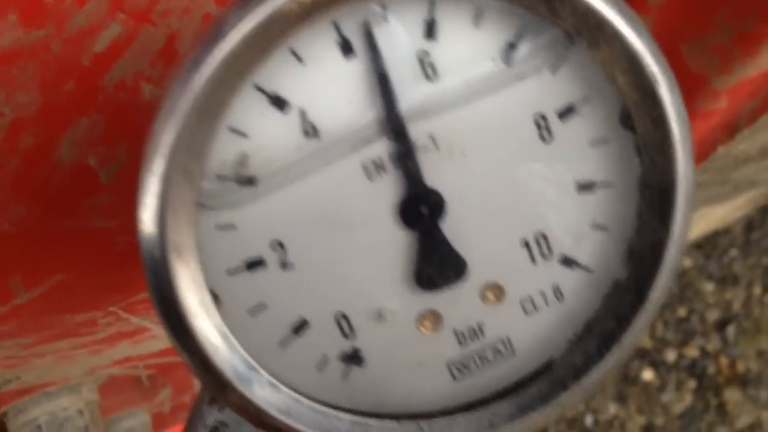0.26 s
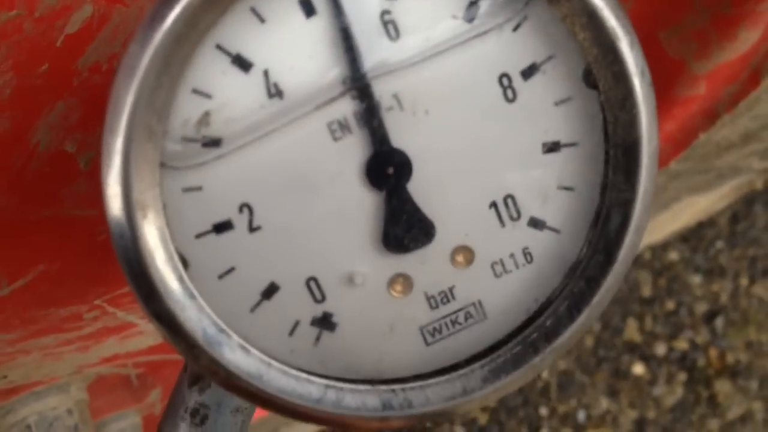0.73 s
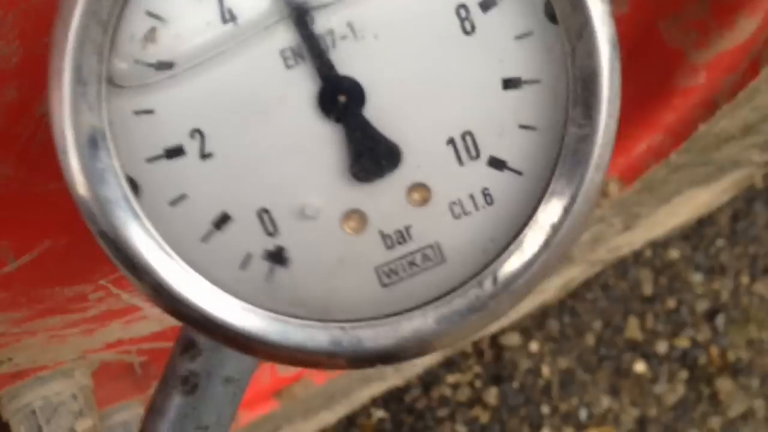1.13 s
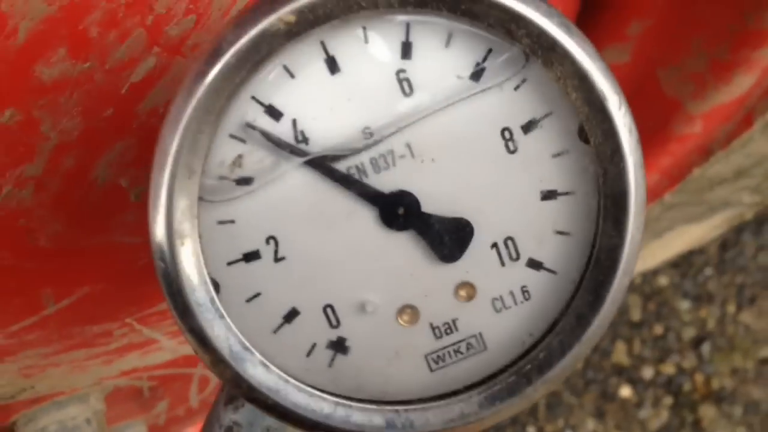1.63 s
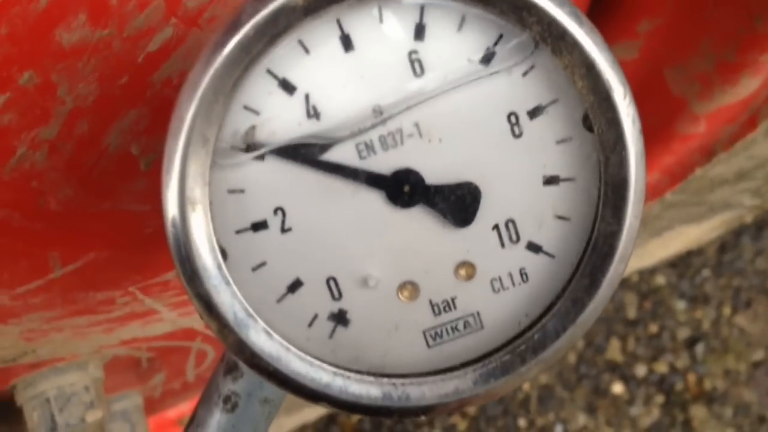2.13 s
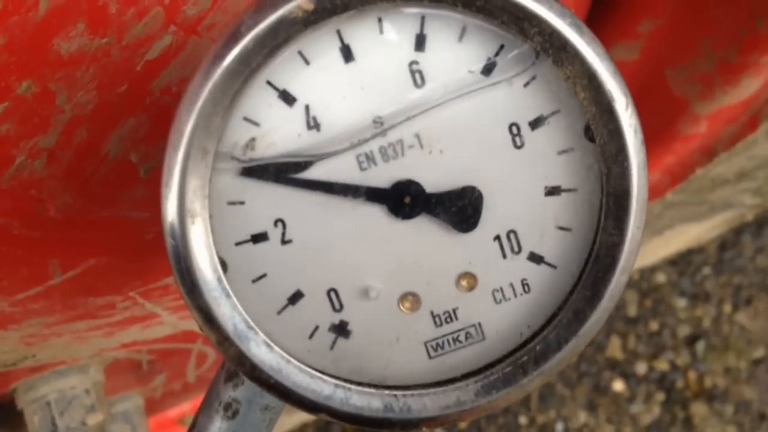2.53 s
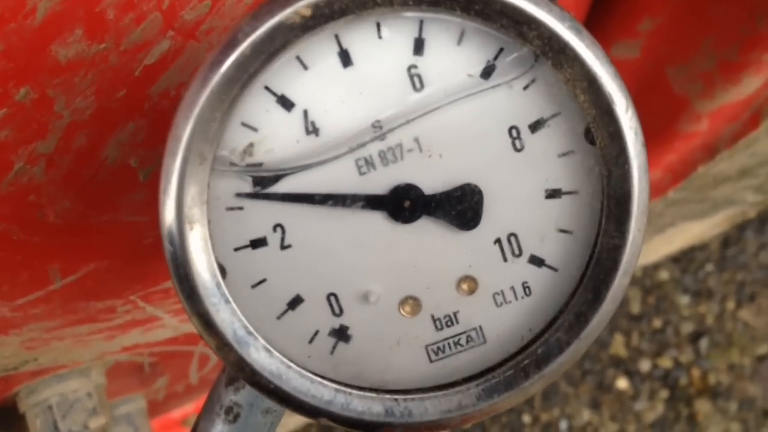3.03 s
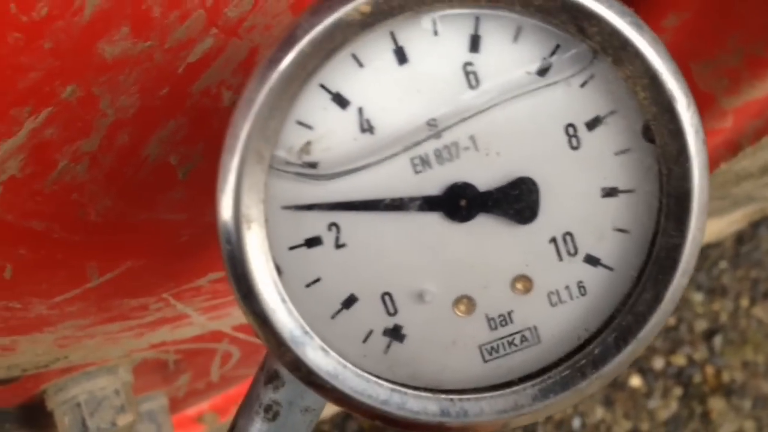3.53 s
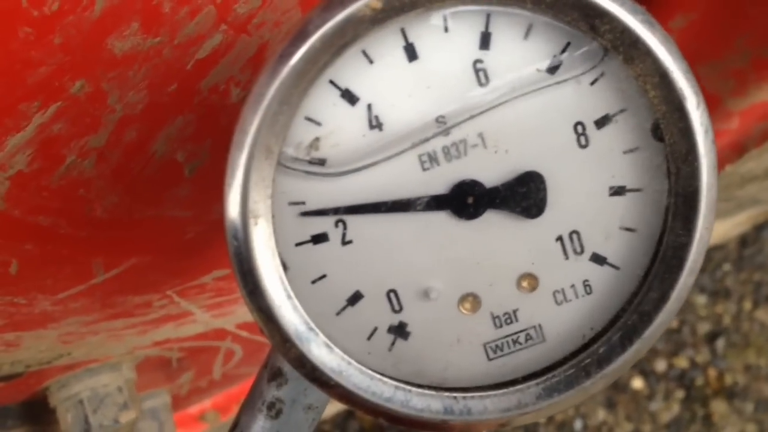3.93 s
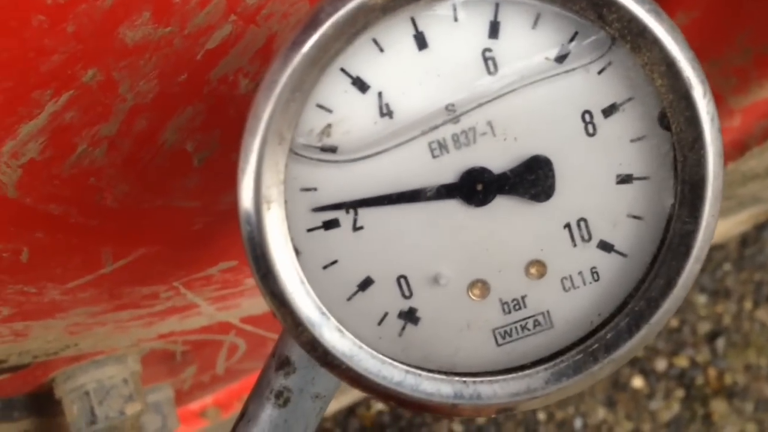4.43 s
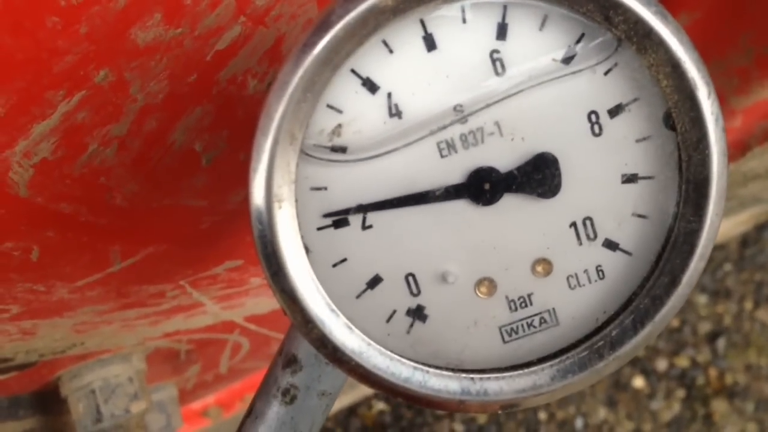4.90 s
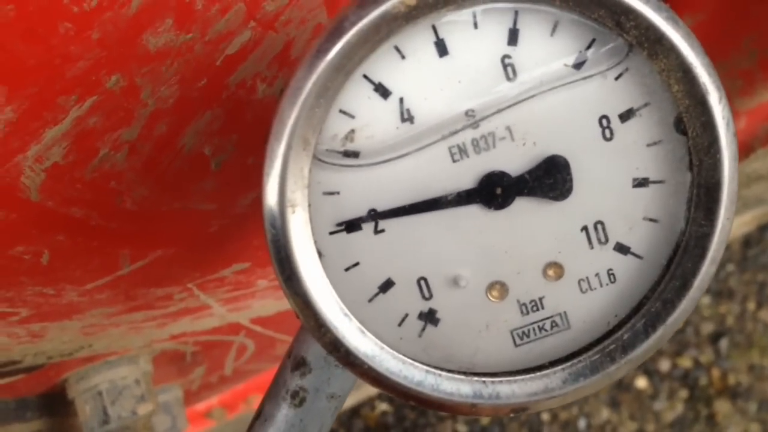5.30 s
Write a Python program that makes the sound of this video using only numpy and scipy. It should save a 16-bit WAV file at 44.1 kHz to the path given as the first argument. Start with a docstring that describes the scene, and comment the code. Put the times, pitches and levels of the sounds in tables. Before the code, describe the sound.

Loud bright air hiss with a wavering metallic whistle cuts off abruptly, ringing away briefly, then faint handle clicks and small bird chips in a quiet yard.

```python
"""Inflating a farm tyre

Compressed air rushes through a hose into a big farm tyre: turbulent noise excites its steel rim and air chamber.
The valve shuts, the hose thumps softly as damped low modes, and the tyre's resonances die away.
The inflator handle ticks in the hand, each tick a set of damped modes with a snap of contact noise.
A small bird chips sharply as gliding tones with rasp, over filtered noise for the yard and a low distant rumble.
"""
import sys
import numpy as np
from scipy import signal
from scipy.fft import rfft, irfft, next_fast_len
from scipy.io import wavfile
from scipy.ndimage import uniform_filter1d

SR = 44100
rng = np.random.default_rng(int(sys.argv[2]) if len(sys.argv) > 2 else 0)


def master_out(mix):
    """Clip the mix to full scale and print it as 16-bit PCM to the path in sys.argv[1]."""
    frames = np.transpose(np.atleast_2d(mix))
    ceiling = np.clip(frames, -1, 1)
    pcm = np.round(ceiling * 32767).astype(np.int16)
    wavfile.write(sys.argv[1], SR, pcm)


N = 245182
TIME = np.arange(N) / SR  # s

# Spectra give relative density; the noise made from them is scaled to unit rms.
# Open-air hush of the yard: frequency_hz, density_db_per_hz
YARD_SPECTRUM = [(140, -30), (230, -7.5), (299, 1), (496, -6), (542, -4), (656, -7.5), (1420, -12),
                 (1720, -10.5), (3390, -11.5), (5070, -11.5), (5640, -12.5), (6600, -14.5), (15000, -18)]
YARD_DB, YARD_FADE_DB_PER_S = -62, 0.41  # level at the start, slow fade
# Decay of the yard's echo tail: frequency_hz, t60_s
YARD_DECAY = [(500, 0.21), (3000, 0.49), (6000, 0.35), (12000, 0.039)]
# Distant rumble: frequency_hz, density_db_per_hz
RUMBLE_SPECTRUM = [(20, -25), (40, -6), (65, -4.5), (92, 2), (118, -4), (146, 5), (175, -5), (205, -5),
                   (245, -14), (420, -26.5), (900, -36)]
# Rumble level at the start, total fall, curvature of the fall (slow at first)
RUMBLE_DB, RUMBLE_FADE_DB, RUMBLE_FADE_POWER = -55.5, 4.5, 1.4
# Faint uneven rustle: frequency_hz, density_db_per_hz
RUSTLE_SPECTRUM = [(1000, -28), (1400, -5), (1700, -4.5), (2250, -5.5), (2900, -11), (5000, -30)]
RUSTLE_DB, RUSTLE_FADE_DB_PER_S = -71.5, 1  # steady part: level at the start, slow fade
# Soft swells of the rustle: peak_s, level_db, half_width_s
RUSTLE_SWELLS = [(1.62, -62, 0.13), (3.2, -82, 0.24), (4.48, -73, .18)]

# Bird chips: start_s, level_db, length_s
BIRD_CHIPS = [(1.228, -52.5, .03), (1.442, -56, 0.031), (1.766, -55, .033), (2.011, -53, 0.03),
              (2.2, -60, 0.042), (2.349, -56, 0.034), (2.481, -59.5, 0.044), (2.622, -62, 0.042),
              (2.779, -62, 0.066), (3.075, -60.5, 0.05), (3.802, -54, 0.031), (3.996, -54, 0.035),
              (4.55, -54.5, 0.037), (4.748, -54.5, 0.033), (4.958, -56, .037)]
CHIP_HZ, CHIP_SCATTER = 5944, 0.0079  # mean starting pitch, and its random spread as a share
CHIP_RISE, CHIP_BODY, CHIP_TRAIL = 0.14, 0.38, 0.12  # attack and body (shares of length), trailing strength
# Thin soft peeps, the first like an echo of the chip just before it:
# start_s, level_db, starting_pitch_hz, length_s
SOFT_PEEPS = [(2.648, -61, 5300, 0.017), (3.014, -70, 5370, .035), (3.266, -70, 5000, 0.032),
              (4.068, -71, 3800, .08), (4.515, -70, 5150, 0.028), (4.879, -69, 5230, .04)]
PEEP_FALL = 0.072  # share by which a peep's pitch sinks

# Modes of the inflator handle: frequency_hz, relative_level_db, t60_s
HANDLE_MODES = [(433, -1, 0.011), (690, -1, 0.0081), (1160, -4.5, 0.014), (1920, -0.5, 0.012),
                (3440, -8, .006)]
# Clicks of the handle: start_s, level_db, brightness_db_per_octave, snap_db (relative to the level)
HANDLE_CLICKS = [(1.446, -51, 2, -10), (1.6712, -43, -4, -14), (1.7126, -43, -8, -2.5), (1.755, -57, 3, 9),
                 (1.7638, -44.5, 7, 4.5), (1.771, -47.5, -11.5, -14), (2.1755, -48.5, 1, 3),
                 (2.2635, -56, 7, -4), (2.3057, -35, 2.5, -15), (2.352, -49.5, -6, -4)]
# Contact snap of the handle: frequency_hz, density_db_per_hz
SNAP_SPECTRUM = [(100, -8), (600, -10), (1800, 2), (3400, 2.5), (4400, -13), (7000, -17), (15000, -15)]
# Low modes of the hose: frequency_hz, relative_level_db, t60_s
HOSE_MODES = [(99, 2, 0.051), (199, -4, 0.047), (370, -17, 0.029)]
# Soft thumps of the hose, the first about when the valve shuts: start_s, level_db
HOSE_THUMPS = [(1.0884, -30), (1.452, -44), (3.275, -43), (4.012, -46)]

SHUT_S = 1.1025  # the valve closes
# Hiss of the jet: frequency_hz, density_db_per_hz
JET_SPECTRUM = [(30, -45), (120, -29), (200, -14.5), (400, -16.5), (600, -6.5), (800, -16), (1400, -21),
                (4000, -1.5), (7000, -9.5), (11000, -8), (15000, -11.5)]
JET_DB, JET_T60 = -37.5, 0.24  # mean level in dB, decay of the flow in s
# Dense ringing of the tyre: frequency_hz, density_db_per_hz
TYRE_SPECTRUM = [(500, -44), (1000, -14), (1440, -13), (1580, -4.5), (1980, -1), (2100, 1), (2480, 0.5),
                 (2900, -3.5), (3450, 0.5), (3720, 5), (4300, -0.5), (5500, -4.5), (6800, -10.5),
                 (14000, -27)]
TYRE_DB = -33.5
# Decay of the dense ringing: frequency_hz, t60_s
TYRE_DECAY = [(600, 1), (2100, 0.84), (3600, 0.71), (5500, 0.58), (10000, 0.37)]
# Strongest modes of the steel rim: frequency_hz, rms_db (before the trim in tyre)
RIM_MODES = [(1577, -53.5), (1674, -51.5), (1712, -48), (2051, -49), (2180, -49.5), (2422, -48.5),
             (2600, -57.5), (3149, -42.5), (3300, -48), (3682, -51.5), (3747, -42), (3860, -58),
             (4102, -42), (4468, -83), (4635, -56), (4753, -51.5), (4867, -52), (5346, -47.5)]
# Modes of the air chamber: frequency_hz, rms_db (before the trim in tyre)
CHAMBER_MODES = [(678.3, -63), (775.2, -67), (834.4, -62.5), (904.4, -66.5), (979.8, -68), (1044, -68),
                 (1125, -67.5), (1195, -57)]
# Decay of the rim and chamber modes: frequency_hz, t60_s
MODE_DECAY = [(600, 0.4), (2100, 0.84), (3700, 0.55), (5500, 0.49)]
SING_HZ = 3680  # centre pitch of the valve's whistle
# Level of the valve's whistle while air flows: time_s, level_db
SING_LEVEL = [(0, -35.5), (.1, -39), (.19, -35), (.36, -42), (.6, -40), (.74, -43), (.81, -34.5), (.9, -44),
              (1.09, -43.5)]

EDGE_HZ = 15350  # upper band limit of the recorder


def gain_of(db):
    """Logarithmic level: converts decibels to an amplitude ratio."""
    return 10 ** (np.asarray(db) / 20)


def evened(x):
    """Normalisation of power: scales a signal to unit rms."""
    return x / np.sqrt(np.mean(x ** 2) + 1e-20)


def read(points, hz):
    """Interpolation on a logarithmic frequency axis."""
    f, value = np.transpose(points)
    return np.interp(np.log(hz + 1), np.log(f + 1), value)


def add(mix, s, sound):
    """Superposition: sums a sound into the mix, in place, from time s."""
    part = mix[round(s * SR):][:len(sound)]
    part += sound[:len(part)]


def noise(shape):
    """Spectral shaping: white noise filtered by the amplitude response shape(Hz), at unit rms."""
    size = next_fast_len(N)
    spectrum = rfft(rng.standard_normal(size))
    hz = np.fft.rfftfreq(size, 1 / SR)
    return evened(irfft(spectrum * shape(hz), size)[:N])


def coloured(points):
    """Coloured noise: unit-rms noise with a tabled spectral density."""
    return noise(lambda hz: gain_of(read(points, hz)))


def wander(rate_hz):
    """Low-pass random process: slow drift of unit rms."""
    return noise(lambda hz: 1 / (1 + (hz / rate_hz) ** 2))


def die_away(x, start, t60s):
    """Frequency-dependent damping: after the start time each band decays at its own rate."""
    hz, t, z = signal.stft(x, SR, nperseg=512)
    fall_db = -60 * np.maximum(t - start, 0) / read(t60s, hz)[:, None]
    return signal.istft(z * gain_of(fall_db), SR, nperseg=512)[1][:len(x)]


def modes(hz, table, width_hz=8, width_share=0.00029):
    """Resonance curves: amplitude spectrum of narrow peaks that widen with frequency."""
    power = np.zeros(len(hz))
    for f, db in table:
        width = width_hz + width_share * f
        power += gain_of(db) ** 2 / width / (1 + ((hz - f) / width) ** 2) ** 2
    return np.sqrt(power)


def struck(table, t, tilt_db=0):
    """Free vibration after a blow: damped sine modes, tilted in dB per octave about 1 kHz."""
    total = np.zeros(len(t))
    for hz, db, t60 in table:
        level_db = db + tilt_db * np.log2(hz / 1000)
        decay = np.exp(-np.log(1000) * t / t60)
        total += gain_of(level_db) * np.sin(2 * np.pi * hz * t) * decay
    return total


def yard_echo(x, near_db=-7, wall_s=0.024, wall_db=-15, tail_db=-10):
    """Reflection: near surfaces scatter sound at once, a wall answers later, and a thin tail follows."""
    t = np.arange(SR // 2) / SR
    # sparse random reflections, about 2000 a second
    near, wall, far = rng.standard_normal((3, len(t))) * (rng.random((3, len(t))) < 2000 / SR)
    parts = [(near_db, near * np.exp(-t / 0.0049)),
             (wall_db, wall * np.exp(-((t - wall_s) / 0.0061) ** 2)),
             (tail_db, die_away(far, 0, YARD_DECAY))]
    response = sum(gain_of(db) * part / np.linalg.norm(part) for db, part in parts)
    return x + signal.fftconvolve(x, response)[:N]


def open_air():
    """Broadband ambience: coloured noise with a slow fade."""
    return coloured(YARD_SPECTRUM) * gain_of(YARD_DB - YARD_FADE_DB_PER_S * TIME)


def distant_rumble(throb_db=0.8):
    """Amplitude modulation of low noise: an uneven rumble that recedes."""
    recede_db = RUMBLE_FADE_DB * (TIME / TIME[-1]) ** RUMBLE_FADE_POWER
    return coloured(RUMBLE_SPECTRUM) * gain_of(RUMBLE_DB - recede_db + throb_db * wander(18))


def faint_rustle(flutter_db=4.0):
    """Amplitude modulation of band-shaped noise: a fluttering rustle with a few soft swells."""
    steady = gain_of(RUSTLE_DB - RUSTLE_FADE_DB_PER_S * TIME)
    swells = sum(gain_of(db) * np.exp(-((TIME - s) / width) ** 2) for s, db, width in RUSTLE_SWELLS)
    return coloured(RUSTLE_SPECTRUM) * (steady + swells) * gain_of(flutter_db * wander(12))


def whistle(hz, rough):
    """Frequency modulation: a sine on a gliding pitch, with fast random jitter."""
    jitter = evened(uniform_filter1d(rng.standard_normal(len(hz)), size=24))
    return np.sin(2 * np.pi * np.cumsum(hz * (1 + rough * jitter)) / SR)


def chip(length, fall=0.26, bend=0.42, rough=0.041, rasp_db=-21, fray_db=16, buzz_hz=300, buzz_depth=0.43):
    """Modulated tone: starts abruptly and buzzes, then its pitch dives and noise frays it as it fades."""
    u = np.linspace(0, 1, round(length * SR))  # share of the chip elapsed
    start_hz = CHIP_HZ * (1 + CHIP_SCATTER * rng.standard_normal())
    attack = 1 - np.exp(-u / CHIP_RISE)
    body = np.exp(-(u / CHIP_BODY) ** 2) + CHIP_TRAIL
    envelope = attack * body * np.sqrt(1 - u)
    tone = whistle(start_hz * (1 - fall * u - bend * u ** 2), rough * (1 + 2 * u))
    buzz = 1 + buzz_depth * whistle(np.full(len(u), buzz_hz), 0.62)
    rasp_band = signal.butter(1, [2200, 6000], "bandpass", fs=SR, output="sos")
    rasp = evened(signal.sosfilt(rasp_band, rng.standard_normal(len(u))))
    return evened(envelope * (buzz * tone + rasp * gain_of(rasp_db + fray_db * u)))


def peep(hz, length, rough=0.065):
    """Frequency glide: a thin, slightly sinking tone under a half-sine envelope."""
    u = np.linspace(0, 1, round(length * SR))
    return evened(np.sin(np.pi * u) * whistle(hz * (1 - PEEP_FALL * u), rough))


def chips_and_peeps():
    """Superposition of tones: sharp bird chips and thin soft peeps, each at its own level."""
    song = np.zeros(N)
    for s, db, length in BIRD_CHIPS:
        add(song, s, gain_of(db) * chip(length))
    for s, db, hz, length in SOFT_PEEPS:
        add(song, s, gain_of(db) * peep(hz, length))
    return song


def handle(snap_s=0.0022, attack_s=0.00036):
    """Impact excitation: each click is a heavily damped ring with a brief snap of contact."""
    out, t = np.zeros(N), np.arange(SR // 10) / SR
    contact = coloured(SNAP_SPECTRUM)
    attack = 1 - np.exp(-t / attack_s)
    for s, db, tilt_db, snap_db in HANDLE_CLICKS:
        snap = contact[round(s * SR):][:len(t)] * np.exp(-t / snap_s)
        ring = struck(HANDLE_MODES, t, tilt_db)
        add(out, s, gain_of(db) * attack * (ring + gain_of(snap_db) * snap))
    return out


def hose(attack_s=0.0015):
    """Impulse response of damped low modes: jolts of the hose thump softly."""
    out, t = np.zeros(N), np.arange(SR // 10) / SR
    thump = (1 - np.exp(-t / attack_s)) * struck(HOSE_MODES, t)
    for s, db in HOSE_THUMPS:
        add(out, s, gain_of(db) * thump)
    return out


def flow():
    """Exponential release: air flow is steady until the valve shuts, then falls quickly."""
    return np.exp(-np.log(1000) * np.maximum(TIME - SHUT_S, 0) / JET_T60)


def jet(flutter_db=0.8):
    """Turbulence at the valve: broad hiss that collapses once the flow is cut."""
    return coloured(JET_SPECTRUM) * gain_of(JET_DB + flutter_db * wander(23)) * flow()


def valve_whistle(waver_hz=14):
    """Mode locking: the flow locks on to one mode, a wavering tone that collapses with the jet."""
    hz = SING_HZ + waver_hz * wander(33)
    tone = np.sqrt(2) * np.sin(2 * np.pi * np.cumsum(hz) / SR)  # unit rms
    return tone * gain_of(np.interp(TIME, *np.transpose(SING_LEVEL))) * flow()


def dense_ringing(spacing_hz=15):
    """High modal density: countless weak modes leave the noise response finely uneven."""
    ripple_db = 2.4 * rng.standard_normal(4096)

    def response(hz):
        """Modal overlap: a smooth spectrum with random ripple along frequency."""
        ripple = np.interp(hz / spacing_hz, np.arange(len(ripple_db)), ripple_db)
        return gain_of(read(TYRE_SPECTRUM, hz) + ripple)

    return gain_of(TYRE_DB) * noise(response)


def ringing(table):
    """Forced resonance: noise in the tabled modes, at their power-summed level."""
    level = np.linalg.norm(gain_of(np.array(table)[:, 1]))
    return level * noise(lambda hz: modes(hz, table))


def tyre(rim_db=-1.5, chamber_db=-1, surge_db=0.93):
    """Driven resonance: rim, chamber and dense modes ring on after the jet stops, with the whistle added."""
    bed = die_away(dense_ringing(), SHUT_S, TYRE_DECAY)
    tones = gain_of(rim_db) * ringing(RIM_MODES) + gain_of(chamber_db) * ringing(CHAMBER_MODES)
    ring = bed + die_away(tones, SHUT_S, MODE_DECAY) + valve_whistle()
    return ring * gain_of(surge_db * wander(7))


def scene():
    """Superposition at one microphone: the same sum feeds both channels."""
    background = open_air() + faint_rustle() + distant_rumble()
    song = yard_echo(chips_and_peeps(), near_db=-7, wall_s=0.0266, wall_db=-18, tail_db=-7.5)
    jolts = yard_echo(handle() + hose(), near_db=-10, wall_db=-40, tail_db=-16.0)
    mono = background + song + jolts + jet() + tyre()
    return np.array([mono, mono])


def record(dry, low_cut_hz=42):
    """Linear filtering: the recorder's bass roll-off and upper band limit."""
    bass_cut = signal.butter(2, low_cut_hz, "highpass", fs=SR, output="sos")
    band_limit = signal.firwin(701, EDGE_HZ, window=("kaiser", 9), fs=SR)
    return signal.oaconvolve(signal.sosfilt(bass_cut, dry), band_limit[None], "same")


dry = scene()
out = record(dry)
master_out(out)
```